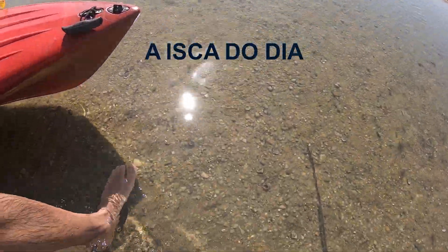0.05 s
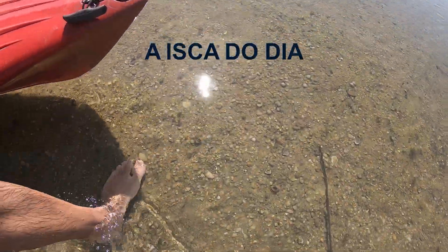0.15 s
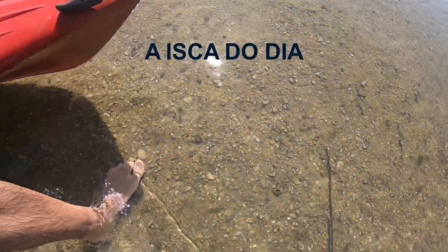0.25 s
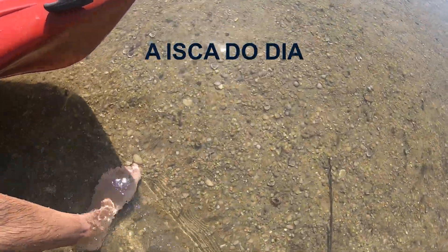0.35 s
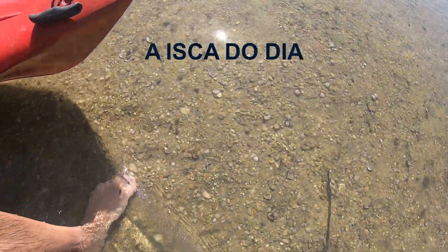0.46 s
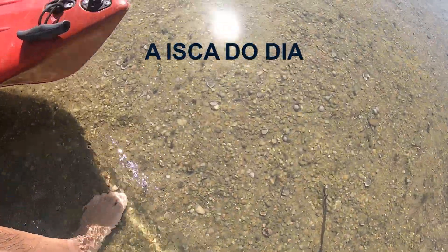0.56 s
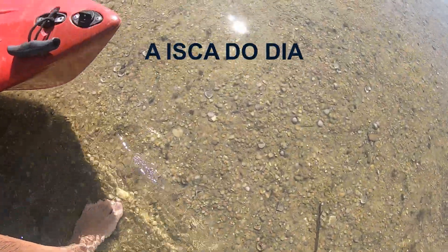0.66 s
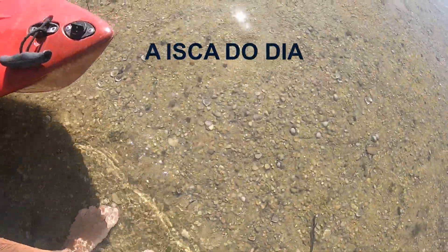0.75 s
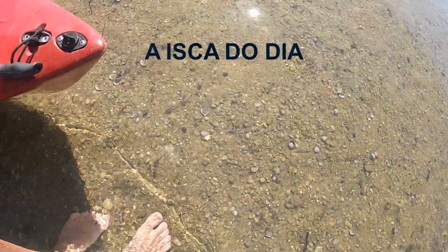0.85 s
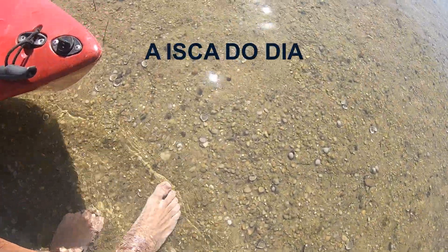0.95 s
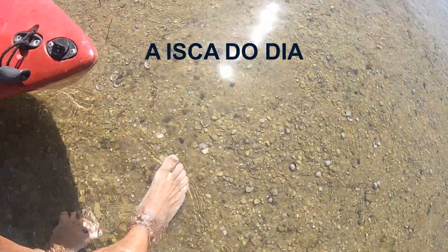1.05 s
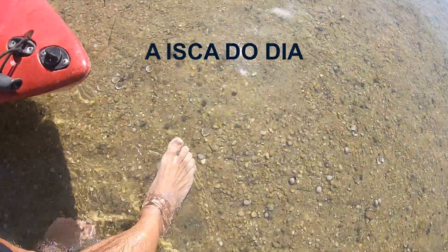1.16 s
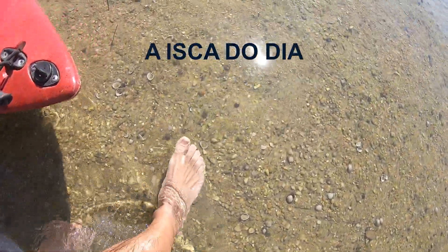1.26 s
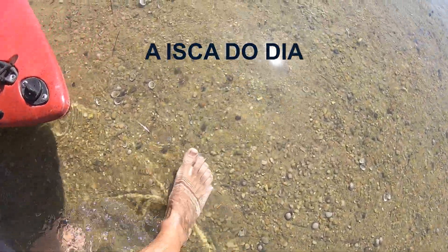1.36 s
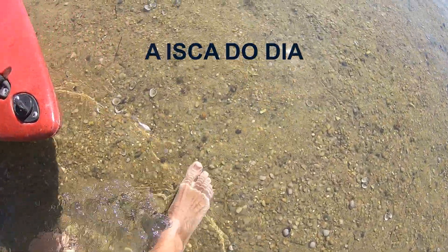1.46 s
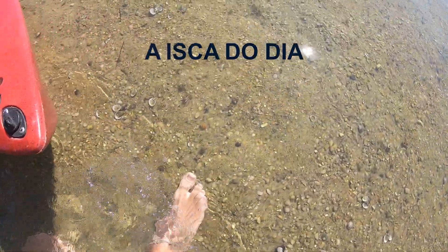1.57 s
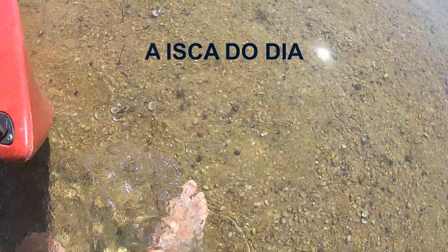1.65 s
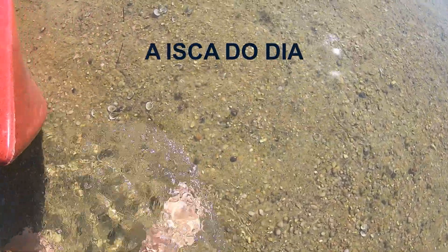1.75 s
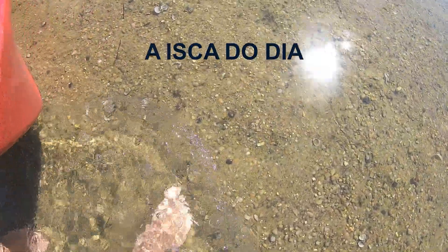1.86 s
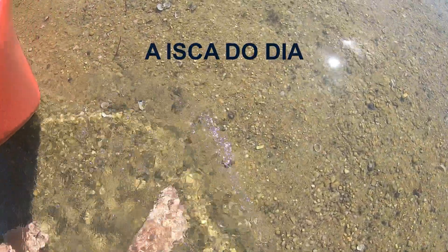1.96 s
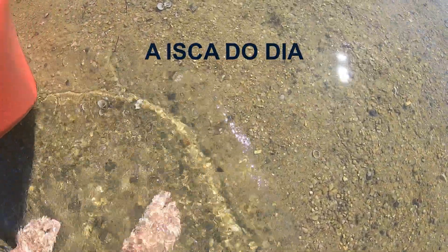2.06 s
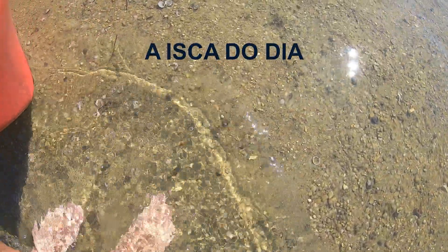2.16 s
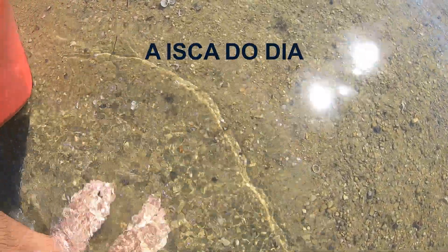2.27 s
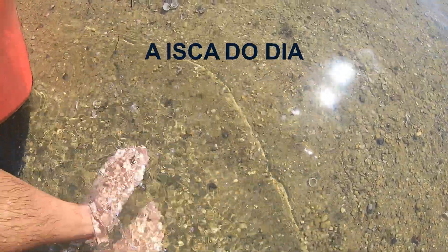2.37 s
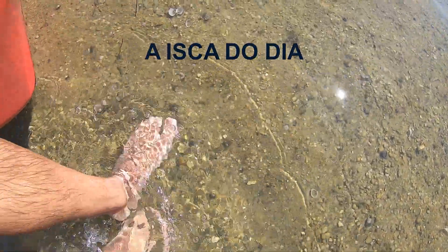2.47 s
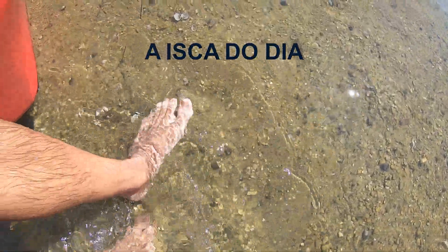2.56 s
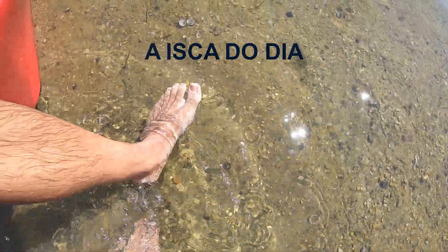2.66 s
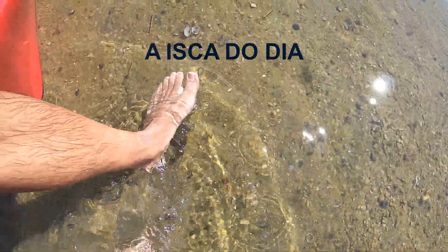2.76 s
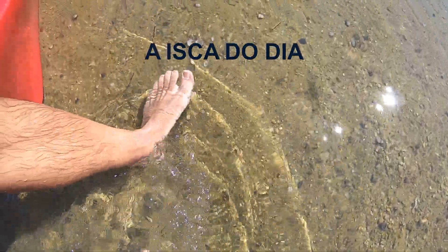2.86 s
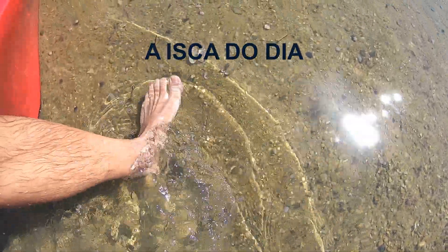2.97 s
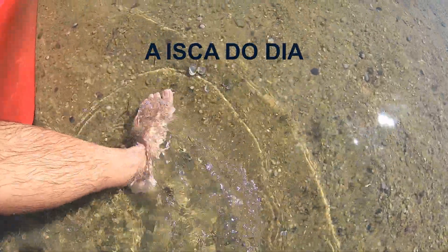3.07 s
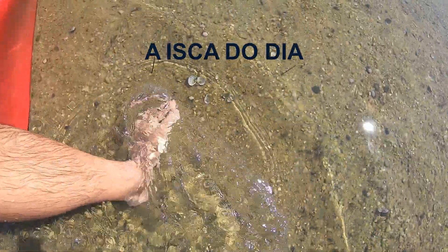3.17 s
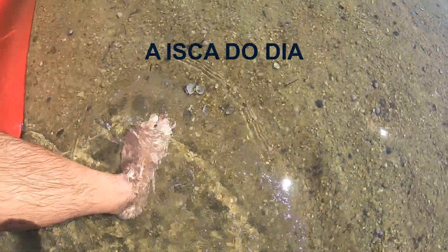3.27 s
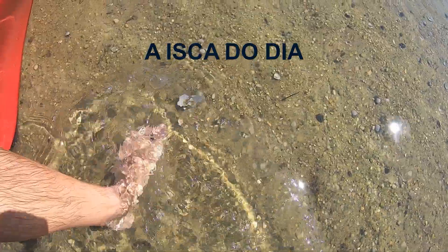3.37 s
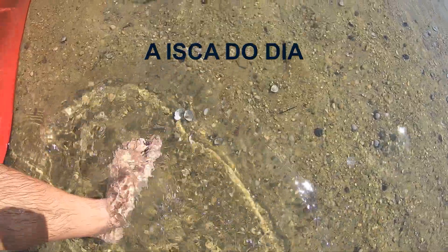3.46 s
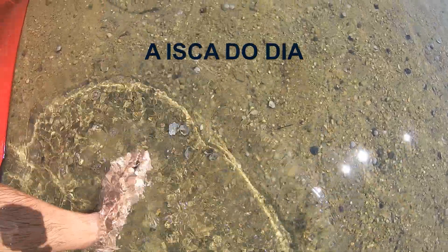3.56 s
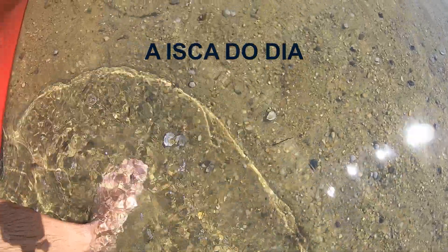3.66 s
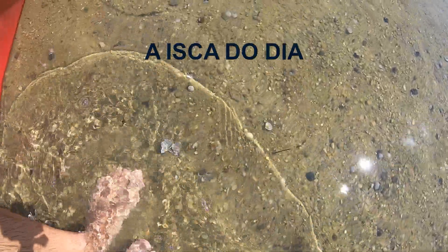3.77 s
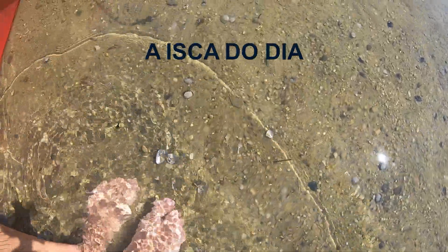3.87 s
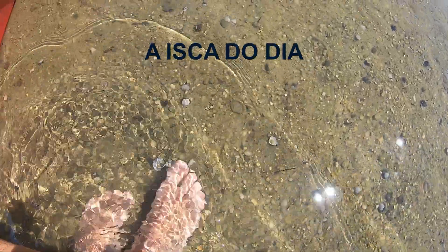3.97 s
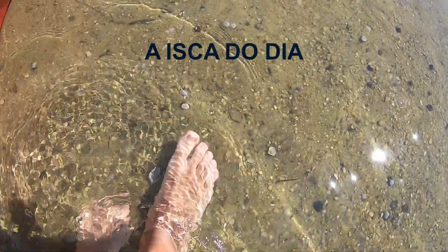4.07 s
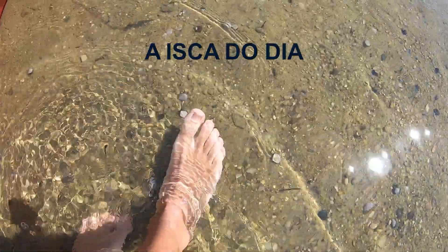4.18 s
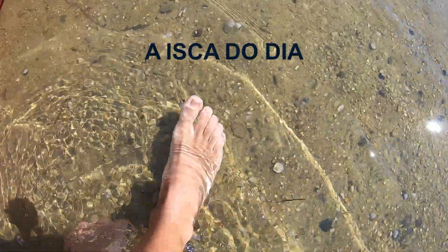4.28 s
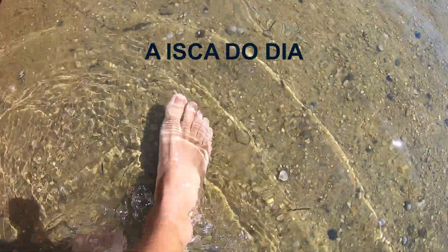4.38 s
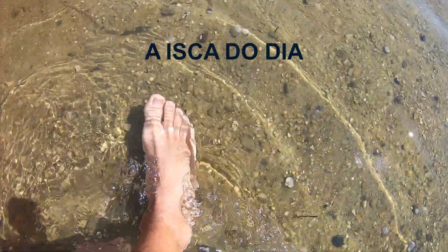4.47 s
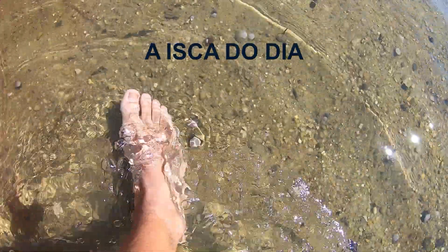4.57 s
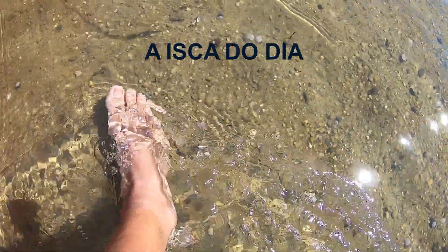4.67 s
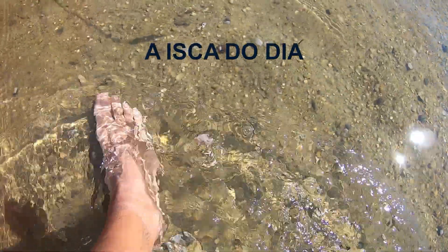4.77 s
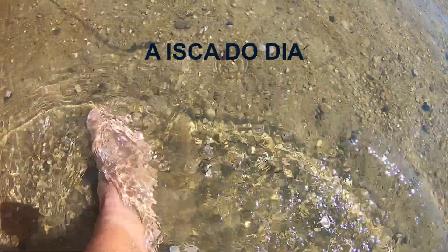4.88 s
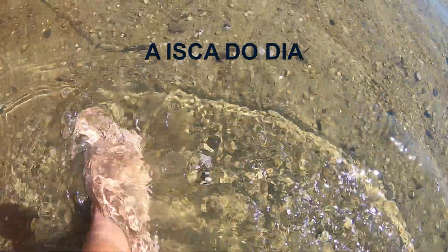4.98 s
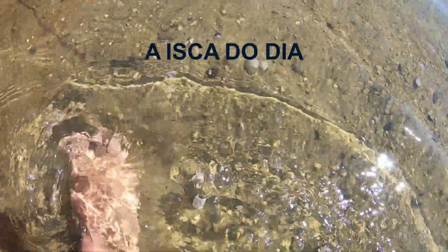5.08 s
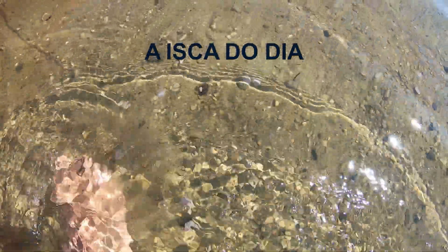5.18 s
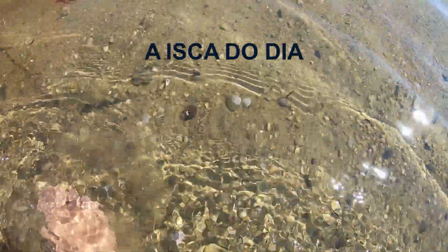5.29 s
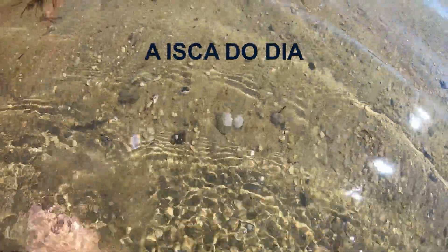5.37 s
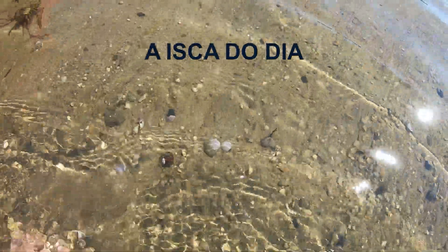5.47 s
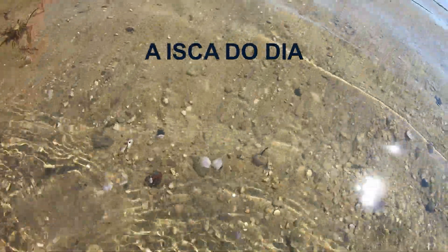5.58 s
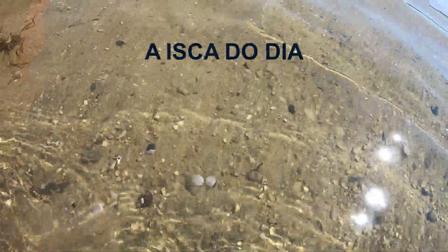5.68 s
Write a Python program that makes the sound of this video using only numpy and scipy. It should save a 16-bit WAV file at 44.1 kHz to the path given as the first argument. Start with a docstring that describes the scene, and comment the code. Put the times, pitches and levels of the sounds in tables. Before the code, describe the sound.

Bare feet wade in the shallows of a calm lake, close to a small camera's microphones. A slosh is already fading at the start, followed by a quiet gap, then uneven bubbly strokes, the hardest splash about midway. Droplets tick and bubbles plop between steps. A faint low drone and hiss lie beneath. Late puffs of wind rumble mostly on the right. Outdoors, dry, without echo.

```python
"""Water churns and bubbles underfoot from the start: bare feet wade through the shallows of a calm lake.
Strokes of the feet drive swarms of decaying sines over noise washes; single bubbles ring out with gliding pitch.
A low drone with a faint microphone hiss, both coloured noise, lies beneath; its level dips, returns and dips again.
Drops tick and ring, and closing air pockets give short pulses.
Late on, puffs of wind rumble as low noise, mostly on the right microphone."""
import sys
import numpy as np
from scipy import signal
from scipy.io import wavfile
from scipy.ndimage import uniform_filter1d

SR = 44100
rng = np.random.default_rng(int(sys.argv[2]) if len(sys.argv) > 2 else 0)


def dump(signal):
    """Clip the signal to [-1, 1] and save it as 16-bit WAV at the path in sys.argv[1]."""
    limited = np.clip(np.atleast_2d(signal).T, -1, 1)
    pcm = np.round(limited * 32767).astype(np.int16)
    wavfile.write(sys.argv[1], SR, pcm)


N = 252693
TIME = np.arange(N) / SR


def amp(db):
    """Decibels to gain."""
    return 10 ** (np.asarray(db) / 20)


def unit(x):
    """Scales to rms 1."""
    return x / np.sqrt(np.mean(x ** 2) + 1e-20)


def read(points, hz):
    """Reads a spectrum in dB on a log-frequency axis."""
    point_hz, point_db = np.transpose(points)
    return np.interp(np.log(hz + 1), np.log(point_hz + 1), point_db)


def colour(x, points, share=1):
    """Minimum-phase filter with a share of the given dB spectrum; causal, so attacks stay sharp."""
    size = 4096
    bin_hz = abs(np.fft.fftfreq(size, 1 / SR))
    log_gain = np.log(amp(share * read(points, bin_hz)))
    spectrum = np.exp(np.conj(signal.hilbert(log_gain)))
    taps = np.fft.ifft(spectrum).real[:size // 2]
    return signal.oaconvolve(np.atleast_2d(x), taps[None], axes=1)[:, :N]


def add(mix, start_s, sound):
    """Mixes a stereo sound in at start_s, cut at the end of the mix."""
    part = mix[:, max(round(start_s * SR), 0):][:, :sound.shape[1]]
    part += sound[:, :part.shape[1]]


def swell(full_s, hold_s, rise_s, fade_s):
    """Attack, hold and release in dB below the top; rise_s and fade_s are times for 20 dB."""
    before_s = np.maximum(full_s - TIME, 0)
    after_s = np.maximum(TIME - full_s - hold_s, 0)
    return -20 * (before_s / rise_s + after_s / fade_s)


SURFACING = 0.515  # added to the pitch shift (inside its tanh limit) at t60, as the bubble nears the surface
WOBBLE, WOBBLE_HZ = 0.025, 47.2  # shape oscillation: share of pitch, rate before the spread between bubbles
BREAKUP_DB = 11  # ripples make the tail flutter: depth at t60


def bubble(hz, t60_s, rise_per_s, place, surfacing=SURFACING, spread_s=2.2e-5, pan_db=2.0, swell_share=0.0012):
    """A pinched-off bubble rings as a decaying sine: pitch glides to a limit, tail flutters."""
    t = np.arange(int(np.clip(t60_s, .002, .25) * SR)) / SR
    side = np.array([[-.5], [.5]]) * place
    t = np.maximum(t + side * spread_s, 0)  # reaches one microphone sooner
    wobble = np.sin(2 * np.pi * (WOBBLE_HZ * 2 ** (place / 2) * t + place))
    glide = np.tanh(rise_per_s * t + surfacing * (t / t60_s) ** 2)
    pitch_shift = glide + WOBBLE * wobble
    turns = hz * (t + np.cumsum(pitch_shift, axis=1) / SR)
    attack_s = 1 / (3 * hz) + swell_share * t60_s * max(rise_per_s, 0)
    decay = amp((BREAKUP_DB * wobble - 60) * t / t60_s)
    ring = (1 - np.exp(-t / attack_s)) * decay
    return amp(side * pan_db) * ring * np.sin(2 * np.pi * turns)


# single bubbles: start_s, pitch_hz, level_db, t60_s, rise_per_s (share of pitch; negative falls)
SINGLE_BUBBLES = [(0.001, 2830, -26.5, 0.0097, -9), (0.002, 1060, -37.5, 0.07, 0.5),
                  (0.004, 531, -45.5, 0.28, 1.5), (0.012, 1530, -35, 0.055, 1.5),
                  (0.039, 1260, -29, 0.036, 6), (0.066, 609, -42.5, 0.2, -1.5),
                  (0.068, 2310, -32, 0.046, -1.5), (0.078, 3000, -24.5, 0.033, -2),
                  (0.119, 518, -37, 0.086, 0.5), (0.146, 450, -43, 0.27, 0), (0.208, 550, -29.5, 0.073, 8),
                  (0.232, 1800, -44, 0.035, -5), (0.306, 484, -48, .21, 3.5), (0.316, 1240, -47, 0.038, -6),
                  (0.382, 1420, -48.5, 0.079, -6.5), (0.513, 2080, -52.5, 0.064, 0),
                  (0.814, 1087, -40.5, 0.14, 6.5), (0.891, 3430, -26.5, 0.016, -26),
                  (0.927, 2780, -27.5, 0.018, 12), (0.949, 730, -30.5, 0.03, 30),
                  (0.953, 481, -34, 0.14, 7), (0.977, 2770, -28.5, 0.016, -17),
                  (0.998, 1160, -31.5, 0.022, -2), (1.026, 438.5, -33.5, 0.19, 4),
                  (1.028, 1635, -30, 0.03, -7), (1.04, 656, -27, .028, 15), (1.048, 728, -29, 0.13, 5),
                  (1.087, 656, -17.5, 0.011, 26), (1.201, 2570, -28.5, .018, -2),
                  (1.212, 2720, -26, 0.021, -6), (1.341, 1960, -37, .022, 0), (1.435, 2960, -34, 0.031, 1),
                  (1.487, 1050, -42.5, 0.088, 5), (1.537, 1950, -37, 0.048, 32),
                  (1.587, 788, -46.5, 0.17, -3), (1.611, 3330, -43, 0.026, -6),
                  (1.66, 916, -31, 0.044, 24.5), (1.67, 416, -29, .19, 13), (1.7, 2710, -38, .02, -12),
                  (1.719, 2540, -40, 0.02, -20), (1.75, 1010, -33.5, 0.093, -3),
                  (1.776, 2940, -27, 0.028, -2.5), (2.117, 705, -44.5, 0.12, 12),
                  (2.238, 1174, -43.5, 0.15, -7.5), (2.243, 2920, -32, 0.013, -9),
                  (2.316, 963, -41, 0.12, 8), (2.34, 744, -38.5, 0.11, 7.5), (2.348, 2810, -31.5, .017, 1),
                  (2.381, 1138, -33, 0.052, 18.5), (2.503, 361, -41.5, 0.3, 4.5),
                  (2.525, 1750, -28, 0.022, 3), (2.531, 1420, -30, 0.022, -3),
                  (2.566, 1670, -18, 0.0024, 69), (2.586, 621, -27.5, 0.073, -8.5),
                  (2.5862, 1290, -5.5, 0.0047, 37), (2.596, 1120, -14, .005, 40),
                  (2.625, 393, -41.5, 0.24, 2), (2.654, 3000, -31, 0.025, -5),
                  (2.658, 775, -36, 0.034, 0.5), (2.67, 908, -34, 0.067, 5.5),
                  (2.677, 330, -35.5, 0.172, 2), (2.733, 738, -34.5, 0.06, -6),
                  (2.747, 1060, -30.5, 0.064, -4), (2.76, 660, -24.5, 0.089, 37),
                  (2.768, 2400, -29, 0.014, 6), (2.796, 2210, -30, 0.028, 7),
                  (2.824, 1940, -29.5, .018, -13), (2.852, 870, -32, .09, -7),
                  (2.853, 2770, -19.5, 0.008, 60), (2.912, 1370, -33.5, 0.031, -14.5),
                  (2.926, 2330, -29.5, .016, 11), (3.07, 580, -58.5, 0.21, 3), (3.18, 803, -27, 0.089, -2),
                  (3.245, 750, -50.5, 0.19, -3), (3.35, 2370, -39.5, 0.055, -7.5),
                  (3.379, 1407, -36.5, 0.053, -8.5), (3.383, 1750, -31.5, 0.018, 48),
                  (3.445, 627, -53, 0.24, -0.5), (3.472, 1564, -42, 0.04, -4.5),
                  (3.792, 2430, -39, 0.02, -3), (3.857, 1360, -30, 0.03, 33),
                  (4.043, 3470, -16.5, 0.012, -51), (4.064, 2720, -23.5, 0.019, 27),
                  (4.106, 1112, -27, 0.045, 1.5), (4.132, 960, -20, 0.012, 23),
                  (4.134, 1733, -31.5, 0.02, -6), (4.1645, 1700, -22, .022, 0),
                  (4.168, 796, -28, 0.033, 22.5), (4.168, 478, -27.5, 0.083, 1.5),
                  (4.264, 1270, -19.5, 0.0097, 45), (4.297, 1530, -31, 0.064, -3),
                  (4.299, 2500, -27.5, .012, 18), (4.329, 2950, -26.5, 0.018, -8),
                  (4.404, 1207, -35, 0.041, -13), (4.433, 1625, -27.5, .022, 7),
                  (4.453, 1100, -30, 0.055, 8.5), (4.481, 1700, -38, .022, 10),
                  (4.5129, 2450, -27.5, .018, -14), (4.525, 1100, -29.5, 0.067, -8.5),
                  (4.532, 778, -37.5, 0.096, 6), (4.536, 1660, -33, .042, 0), (4.576, 1090, -37, 0.089, -1),
                  (4.577, 1570, -21, 0.0087, 70), (4.699, 726, -38.5, 0.082, -6),
                  (4.7, 1494, -25.5, 0.016, -14), (4.701, 2940, -32, 0.014, -12),
                  (4.908, 2400, -25.5, 0.022, 32), (4.91, 930, -48, 0.088, -2.5),
                  (5.023, 1078, -27.5, 0.061, 15)]


def plops(apart=0.64):
    """Single bubbles stand out of the churning, close to the middle."""
    out = np.zeros((2, N))
    places = apart * rng.standard_normal(len(SINGLE_BUBBLES))
    for (start_s, pitch_hz, level_db, t60_s, rise_per_s), place in zip(SINGLE_BUBBLES, places):
        add(out, start_s, amp(level_db) * bubble(pitch_hz, t60_s, rise_per_s, place))
    return out


# feet through the water: full_s, hold_s, rise_s (20 dB), fade_s (20 dB), force_db, spray_db (re force)
FOOT_STROKES = [(0.0, .1, .1, .45, -52.5, -10), (0.872, .35, .16, .55, -49.5, -10.5),
                (1.02, .07, .2, .25, -48, -15), (1.671, .13, .06, .12, -50.5, -7),
                (2.242, .008, .03, .06, -58, -9), (2.35, .09, .1, .1, -54.5, -8.5),
                (2.498, .16, .17, .09, -45, -5.5), (2.758, .1, .05, .22, -47.5, -7.5),
                (3.161, .04, .02, .2, -57.5, -1), (3.36, .04, .16, .22, -58, -7),
                (3.818, .15, .07, .3, -50.5, -8.5), (3.999, .17, .1, .38, -48.5, -8.5),
                (4.42, .11, .15, .18, -51.5, -6), (4.696, .04, .05, .3, -55, -5),
                (5.014, .02, .04, .1, -58, -12), (5.077, .12, .2, .25, -65, -5)]
# spray flung off a foot: full_s, hold_s, force_db
SPRAY_FLINGS = [(0.766, .1, -60), (1.288, 0.032, -61), (1.945, .015, -62.5), (2.153, .08, -65),
                (2.37, .09, -56), (2.656, 0.023, -54), (2.86, .07, -63), (3.038, .06, -62.5),
                (4.761, .3, -65.5)]
FIRM_DB = -46  # force of an ordinary firm stroke, pivot of the steepness
WAKE_DB, WAKE_S = -15, 1.15  # ripples after a stroke: level re force, time to fade 20 dB
FLING_RISE_S, FLING_FADE_S = .02, 0.029  # times for 20 dB
SPRAY_FADE = 0.99  # spray dies sooner: share of the stroke's fade_s


def churn(steepness, calm_db, spray=False):
    """Drive of one bubble size: stroke and wake powers add; larger bubbles need more force."""
    power = 0
    for full_s, hold_s, rise_s, fade_s, force_db, spray_db in FOOT_STROKES:
        stroke_db = swell(full_s, hold_s, rise_s, fade_s * (SPRAY_FADE if spray else 1))
        wake_db = WAKE_DB + swell(full_s, hold_s, rise_s, WAKE_S)
        force_power = amp(force_db + spray * spray_db) ** 2
        power = power + force_power * (amp(stroke_db) ** 2 + amp(wake_db) ** 2)
    if spray:
        for full_s, hold_s, force_db in SPRAY_FLINGS:
            fling_db = force_db + swell(full_s, hold_s, FLING_RISE_S, FLING_FADE_S)
            power = power + amp(fling_db) ** 2
    relative_force = np.sqrt(power) / amp(FIRM_DB)
    return np.hypot(amp(FIRM_DB) * relative_force ** steepness, amp(calm_db))


def clumps(depth_db=1.5, clump_s=.014):
    """Water breaks in small, uneven spurts that release bubbles of all sizes together."""
    span = int(clump_s * SR) + 1
    smooth = uniform_filter1d(rng.standard_normal(N), span)
    spurts = unit(uniform_filter1d(smooth, span // 2 + 1))
    return unit(amp(depth_db * np.clip(spurts, -2, 2)))


def swarm(level, low_hz, high_hz, count, cycles, spread_db, rise_per_s, even_s):
    """Many bubbles of one size class, denser where the water is churned harder, over a noise wash."""
    chance = np.cumsum(level ** .72)
    vigour = level / level.max()
    draws, normal = rng.random((count, 3)), rng.standard_normal((count, 3))
    out = np.zeros((2, N))
    for (when, size, force), (damping, lift, place) in zip(draws, normal):
        hz = low_hz * (high_hz / low_hz) ** size
        start = np.searchsorted(chance, when * chance[-1])
        # large bubbles ring longer; rough water cuts the ringing short
        t60_s = cycles / hz * np.exp(.5 * damping) / (1 + vigour[start])
        strength = amp(spread_db * min(-np.log(1 - force), 2.6))
        ring = bubble(hz, t60_s, rise_per_s * (.2 + lift), place, surfacing=.15)
        add(out, start / SR, strength * ring)
    # bubbles of any moment share the stride's energy
    span = int(even_s * SR) + 1
    power = uniform_filter1d(uniform_filter1d((out ** 2).mean(0), span), span)
    out *= vigour ** .1 / np.sqrt(abs(power) + .35 * power.mean())
    # far ripples blur between strides; close splashes stay grainy
    wash = rng.standard_normal(N) + 1.03 * rng.standard_normal((2, N))
    return out + amp(-1 - 15 * np.sqrt(vigour)) * wash


def crackle(level, per_s, spread_db, burst_s):
    """Fine droplets patter onto the surface: tiny decaying noise bursts, most of them faint."""
    # per_s is the rate at the highest level; burst_s the decay time constant
    hits = rng.random(N) < per_s / SR * np.sqrt(level / level.max())
    clicks = hits * amp(spread_db * np.minimum(rng.exponential(1, N), 3))
    envelope = signal.lfilter([1], [1, -np.exp(-1 / (burst_s * SR))], clicks)
    noise = rng.standard_normal(N) + 0.14 * rng.standard_normal((2, N))
    return level * unit(envelope * noise)


# spectra of large bubbles, small bubbles and spray: freq_hz, gain_db
LARGE_COLOUR = [(150, -70), (280, -16), (430, -17.5), (530, -4.5), (640, 8), (780, 13), (1400, 6),
                (2500, -79)]
SMALL_COLOUR = [(400, -70), (950, -8), (1600, -3.5), (3500, -3), (4300, -11.5), (5400, -28), (9000, -62)]
SPRAY_COLOUR = [(1500, -98), (3300, 3), (4600, 0.5), (6000, -1.5), (7600, 0.5), (9000, -5.5), (11000, -11),
                (13000, -16.5), (15500, -27)]


def gurgle():
    """Largest bubbles gulp, large ones glug, small ones tinkle, the finest fizz; droplets crackle."""
    spurts = clumps()
    deep = spurts * churn(steepness=3.3, calm_db=-74.0)
    large = spurts * churn(steepness=1.35, calm_db=-79.5)
    small = spurts * churn(steepness=1.02, calm_db=-79)
    spray = spurts * churn(steepness=0.87, calm_db=-77.5, spray=True)
    gulps = swarm(deep, 320, 560, count=260, cycles=216, spread_db=4.5, rise_per_s=1.4, even_s=0.12)
    glugs = swarm(large, 519.4, 1248, count=700, cycles=58, spread_db=5.0, rise_per_s=5, even_s=0.09)
    tinkle = swarm(small, 1146, 4620, count=3900, cycles=58, spread_db=6.3, rise_per_s=5, even_s=0.07)
    fizz = swarm(spray, 4180, 14780, count=3600, cycles=41, spread_db=7.5, rise_per_s=4.9, even_s=0.1)
    splatter = crackle(small, per_s=1200, spread_db=20, burst_s=0.0002)
    patter = crackle(spray, per_s=790, spread_db=33.0, burst_s=0.0011)
    out = amp(-7.5) * deep * unit(colour(gulps, LARGE_COLOUR))
    out += amp(-3.0) * large * unit(colour(glugs, LARGE_COLOUR))
    out += amp(-0.3) * small * unit(colour(tinkle, SMALL_COLOUR))
    out += amp(-1.5) * spray * unit(colour(fizz, SPRAY_COLOUR))
    out += amp(1.5) * colour(splatter, SMALL_COLOUR)
    out += amp(-4.0) * colour(patter, SPRAY_COLOUR)
    return out


# spectrum of drone and hiss, relative: freq_hz, gain_db
DRONE_COLOUR = [(20, -6), (70, -9), (105, -21), (145, -1.5), (218, 2), (270, -9), (380, -16.5), (1500, -27),
                (6500, -35.5), (8000, -50), (9600, -37), (15000, -57)]
# level of drone and hiss before widening: time_s, level_db
DRONE_CURVE = [(0, -56), (0.9, -57.5), (2.6, -64), (3.4, -63), (4.1, -58.5), (5.73, -63.5)]


def drone():
    """Steady low drone with a faint microphone hiss up high; the level dips, returns, and dips again."""
    time_s, level_db = np.transpose(DRONE_CURVE)
    noise = rng.standard_normal(N) + 0.42 * rng.standard_normal((2, N))
    return amp(np.interp(TIME, time_s, level_db)) * unit(colour(noise, DRONE_COLOUR))


# drops striking the surface: start_s, level_db, pan_db (left minus right), pitch_hz (trapped bubble)
SURFACE_DROPS = [(0.0744, -40, 17, 3690), (0.1456, -36, 0.5, 3470), (0.277, -37, 5, 3870),
                 (0.3945, -44.5, 5, 4150), (0.7758, -42, 12, 3580), (1.699, -39, -4, 5900),
                 (1.714, -33.5, -2, 7270), (1.8122, -26, 3, 3770), (1.8727, -37.5, 2, 3470),
                 (2.461, -25, -4, 3450), (2.4848, -28.5, -6, 6150), (2.5648, -30, -1, 3880),
                 (2.586, -26, -1, 6060), (2.607, -33, -5, 8800), (2.6809, -32, 0, 5430),
                 (2.764, -31, -4, 5400), (2.822, -29, -2, 3620), (2.866, -26.5, -3, 3220),
                 (2.8724, -35, -2, 5400), (3.051, -32.5, -2.5, 3600), (3.149, -34.5, -4, 5400),
                 (3.487, -42, 0, 5340), (3.736, -37.5, -2.5, 4200), (3.9457, -33, -3.5, 5650),
                 (4.0269, -27, -4, 3800), (4.1044, -32.5, -1, 5300), (4.163, -30, -3, 4560),
                 (4.2626, -33.5, 0, 7650), (4.3278, -27.5, -1, 4420), (4.4706, -33, -3, 5170),
                 (4.5123, -43.5, -15, 3980), (4.7182, -30, 0, 5270), (5.247, -41, -11, 5600)]


def drops(tick_db=-2, ring_db=-1, ring_t60_s=0.0081):
    """Each impact is a sharp noise tick, and the tiny bubble that it traps rings for a moment."""
    t, out = np.arange(300) / SR, np.zeros((2, N))
    band = signal.butter(2, [2500, 7500], "bandpass", fs=SR, output="sos")
    for start_s, level_db, pan_db, pitch_hz in SURFACE_DROPS:
        gain = amp(level_db + np.array([[.5], [-.5]]) * pan_db)
        grit = rng.standard_normal(len(t)) + 0.34 * rng.standard_normal((2, len(t)))
        tick = signal.sosfilt(band, grit * np.exp(-t / .0008))
        add(out, start_s, gain * amp(tick_db) * tick / abs(tick).max())
        ring = bubble(pitch_hz, ring_t60_s, 0, rng.standard_normal())
        add(out, start_s, gain * amp(ring_db) * ring)
    return out


# air pockets clapping shut against a foot: centre_s, level_db
POCKET_SLAPS = [(1.6693, -37), (2.5645, -26), (2.5867, -18), (3.1803, -32), (4.1705, -32)]


def slaps(width_s=0.00017):
    """A closing pocket gives one short swing of pressure."""
    out = np.zeros(N)
    for centre_s, level_db in POCKET_SLAPS:
        u = (TIME - centre_s) / width_s
        out -= amp(level_db) * (1 - u ** 2) * np.exp(-np.minimum(u ** 2, 100) / 2)
    return out


# wind spectrum, relative: freq_hz, gain_db
WIND_COLOUR = [(15, -29), (30, -1.5), (70, 2.5), (105, -3.5), (150, -14.5), (220, -26.5), (400, -46.5),
               (1000, -47), (5000, -100)]
# puffs of wind: full_s, hold_s, level_db (before the left and right gains)
WIND_GUSTS = [(3.772, 0.088, -49), (4.232, 0.012, -36), (4.372, 0.024, -48), (4.502, 0.024, -43),
              (4.645, 0.22, -38.5), (4.927, 0.38, -33)]


def wind(left_db=-15, right_db=5, rise_s=0.042, fade_s=0.017, wake_db=-21, wake_s=0.49):
    """Eddies rumble on each microphone separately, mostly the right; each puff leaves a weak wake."""
    power = 0
    for full_s, hold_s, level_db in WIND_GUSTS:
        puff = amp(level_db + swell(full_s, hold_s, rise_s, fade_s))
        wake = amp(level_db + wake_db + swell(full_s, hold_s, rise_s, wake_s))
        power = power + puff ** 2 + wake ** 2
    eddies = unit(colour(rng.standard_normal((2, N)), WIND_COLOUR))
    # evens out the slow level swings of the noise
    eddies /= np.sqrt(abs(uniform_filter1d(eddies ** 2, 3000, axis=1)) + 0.018)
    return amp([[left_db], [right_db]]) * np.sqrt(power) * eddies


def scatter(x, t60_s=0.026, wet_db=-17):
    """Legs, hull and ripples throw back a brief, faint scatter; open water has no longer echo."""
    t = np.arange(6000) / SR
    taps = rng.standard_normal((2, len(t)))
    taps *= rng.random((2, len(t))) < .08  # sparse
    taps *= (t > .002) * np.exp(-np.log(1000) * t / t60_s)
    taps /= np.linalg.norm(taps, axis=1, keepdims=True)
    return x + amp(wet_db) * signal.oaconvolve(x, taps, axes=1)[:, :N]


# stereo width of water, drone and hiss, opening from near mono: time_s, side_gain_db
WIDTH_CURVE = [(0, -48), (.5, -25), (1.1, -5), (1.7, 4), (2.6, 2), (4.3, 7)]


def widen(x):
    """Opens the stereo image by scaling the side signal along the width curve."""
    time_s, side_db = np.transpose(WIDTH_CURVE)
    mid = x.mean(0)
    return mid + amp(np.interp(TIME, time_s, side_db)) * (x - mid)


def scene():
    """Water, drone with hiss, and wind; the water sounds carry almost no bass."""
    water = plops() + gurgle() + drops() + slaps()
    bass_cut = signal.butter(2, 220, "highpass", fs=SR, output="sos")
    water = signal.sosfilt(bass_cut, water)
    return widen(scatter(water) + drone()) + wind()


# tilt between the microphone ports, scaled by each share: freq_hz, gain_db
PORT_TILT = [(300, -0.07), (4400, 0), (6000, 2.5), (8200, 5), (10000, -0.5), (12000, 0.5), (15000, -5)]
EDGE_HZ = 15900


def record(dry):
    """Opposite tilts make the right port brighter than the left over 4.4-10 kHz; then the band limit."""
    left = colour(dry[0], PORT_TILT, share=-0.9)
    right = colour(dry[1], PORT_TILT, share=0.8)
    band_limit = signal.firwin(511, EDGE_HZ, window=("kaiser", 9), fs=SR)
    return signal.oaconvolve(np.vstack([left, right]), band_limit[None], "same")


dry = scene()
out = record(dry)
dump(out)
```